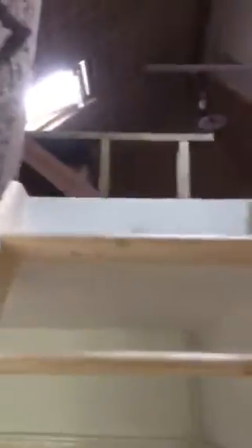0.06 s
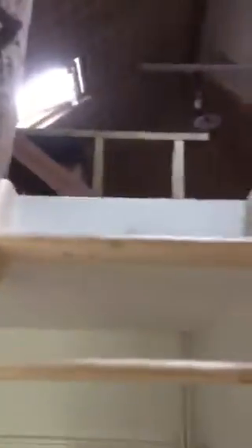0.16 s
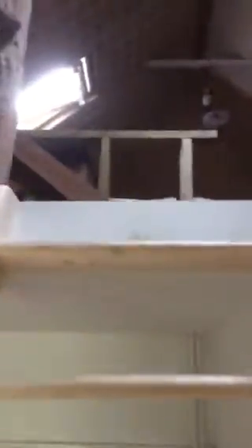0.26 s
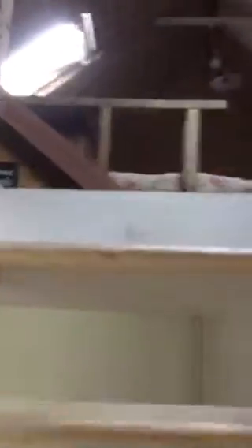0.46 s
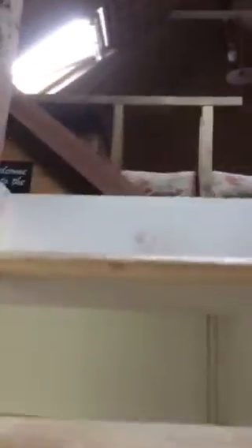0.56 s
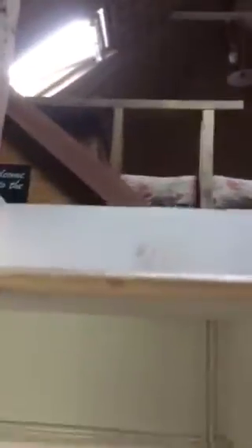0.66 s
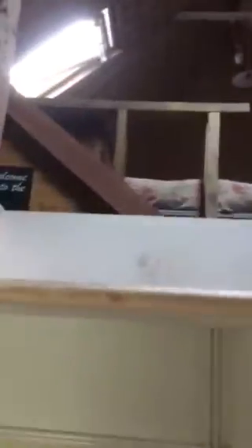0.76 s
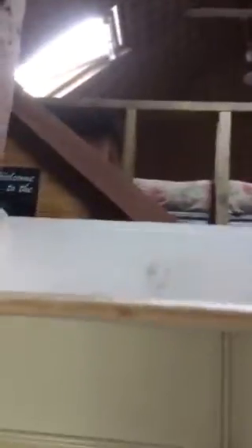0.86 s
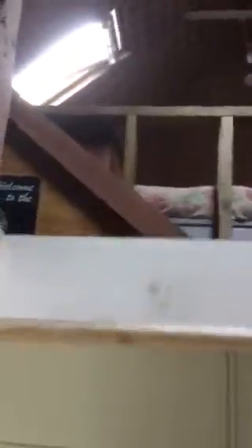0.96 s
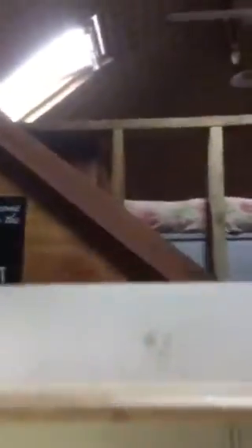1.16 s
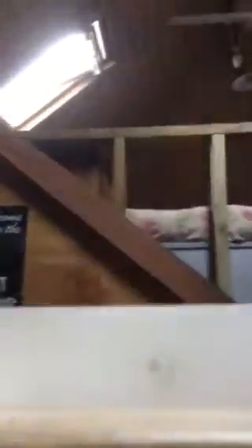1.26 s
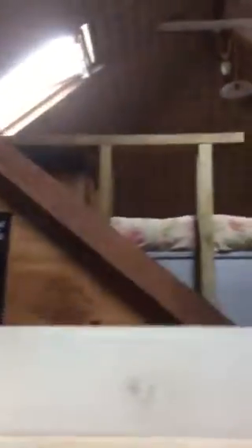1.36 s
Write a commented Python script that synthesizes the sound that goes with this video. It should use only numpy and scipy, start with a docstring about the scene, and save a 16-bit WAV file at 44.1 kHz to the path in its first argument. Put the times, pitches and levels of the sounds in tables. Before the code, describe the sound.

Heavy footsteps on wooden stairs: a hard slapping thud, then a duller knock, with faint creaks

```python
"""Two heavy steps on a wooden stair

Two heavy footsteps climb a wooden ladder-stair in a small room, close by.
Each foot knocks on a tread and the sole slaps flat: short bursts of coloured noise.
The weight sets the stair booming and the tread board ringing: fading sine tones and low noise.
Cloth and soles brush (grainy noise), and the wood ticks, creaks, pings and groans faintly.
Under it all lies the steady, quiet noise of the house."""
import sys
import numpy as np
from scipy import signal
from scipy.fft import rfft, irfft, next_fast_len
from scipy.io import wavfile
from scipy.ndimage import map_coordinates

SR = 44100
rng = np.random.default_rng(int(sys.argv[2]) if len(sys.argv) > 2 else 0)


def pcm_store(signal):
    """Save signal as 16-bit PCM."""
    levels = np.round(np.clip(np.atleast_2d(signal), -1, 1) * 32767)
    wavfile.write(sys.argv[1], SR, levels.astype(np.int16).T)


N = 61740  # length in samples: 1.4 s

# In every table, t60 is the time a sound takes to fade by 60 dB.
# The weight comes down: (time [s], level [dB], tread [0 lower, 1 upper])
THUDS = [(0.2331, -34.5, 0), (0.2530, -21.5, 0), (0.9206, -25.5, 1), (0.9640, -35, 1)]
# Low tones of the stair; those with an excess start sharp and sag as the weight loads them:
# (frequency [Hz], t60 [s], swell [s], starting excess [share of the frequency],
#  level on the lower tread [dB], level on the upper tread [dB])
STAIR_MODES = [(55.75, 0.4, 0.084, 0.15, 0, -1), (59.9, 0.39, 0.014, 0.39, -8, -8),
               (115.1, 0.32, 0.0048, 0.208, 4.5, -15), (150.7, 0.5, 0.051, 0.0082, -5, 4),
               (147.9, 0.4, 0.0027, 0.1934, -4.5, -7), (171, 0.093, 0.0061, 0.97, -6.5, -13.5),
               (202.05, 0.31, 0.0143, 0.02, -12, 1), (235.2, 0.42, 0.0051, 0.019, -55, -14.5),
               (253, 0.31, 0.0098, 0.06, -34.5, -13), (273, 0.41, 0.0058, 0, -24.5, -13.5),
               (306.4, 0.38, 0.0021, 0.035, -19, -26), (413.5, 0.252, 0.0021, 0.028, -19.5, -26)]
SAG_S = 0.0411
# Colour of the noisy part of the boom: (frequency [Hz], level [dB])
BOOM_COLOUR = [(25, -47), (45, -20), (65, -5), (95, 1.5), (150, 4.5), (210, -4), (300, -9), (450, -27),
               (900, -46.5)]
BOOM_DB, BOOM_T60_S, BOOM_SWELL_S = -13, 0.55, 0.0079

# The sole slaps flat: (time [s], level [dB], t60 [s], tilt [dB per octave],
#  room level [dB], tread [0 lower, 1 upper])
SLAPS = [(0.2538, -25.5, 0.023, 0.9, -5, 0), (0.2574, -29.5, 0.044, -3.5, -1.5, 0),
         (0.972, -37, 0.057, 0, -9, 1)]
# Colour of a slap: (frequency [Hz], level on the lower tread [dB], level on the upper tread [dB])
SLAP_COLOUR = [(100, -18, -13), (294, 0.5, -13), (480, -11.5, -7), (640, -5, -11), (876, -3.5, 4),
               (1230, 4.5, 4), (1485, -5.5, -13.5), (1784, -3, 5), (2150, -5.5, -8), (2870, -4.5, -4),
               (3330, -4.5, -13.5), (3800, -10, -11.5), (4270, -18, -13.5), (6730, -10.5, -18),
               (8060, -12, -15), (11300, -15, -22.5), (15500, -38, -25)]
SLAP_ATTACK_S = 0.00039

# The foot meets the lower, then the upper tread: (time [s], level [dB], t60 [s],
#  hollow ring frequency [Hz], hollow ring level [dB], hollow ring t60 [s])
KNOCKS = [(0.231, -36.5, 0.17, 281.8, -27.5, 0.095), (0.9206, -32, 0.083, 864, -31, 0.075)]
# Colour of a knock: (frequency [Hz], level on the lower tread [dB], level on the upper tread [dB])
KNOCK_COLOUR = [(101, -27, -35), (206, 6.5, 2), (350, 2, -12.5), (454, -6, 2), (600, -5, -4.5),
                (810, -9, 2.5), (1065, -4, -4), (1490, -9, -14), (1750, -8, -3), (2400, -10.5, -10),
                (3200, -7.5, -20.5), (3970, -13.5, -24), (5140, -22, -27), (8800, -36, -37),
                (15000, -42, -46)]
KNOCK_ATTACK_S, HOLLOW_ATTACK_S, KNOCK_ROOM_DB = 0.0015, 0.0058, -7

# Ring of the tread board:
# (frequency [Hz], t60 [s], level on the lower tread [dB], level on the upper tread [dB])
BOARD_MODES = [(629, .25, -3, -13), (778, .3, -10, 1), (815, .15, -8, 0), (940, .24, 0, -4),
               (1086, .28, -1, -14), (1121, .28, -5, -10), (1254, .28, -3, -9), (1328, .25, -4, -18),
               (1570, .25, -3, -18), (1703, .26, -3, -10), (2318, .24, -3, -15)]
BOARD_DB, BOARD_ATTACK_S = -43.5, 0.0041

# Sharp slips of a loaded joint: (time [s], level [dB], frequency [Hz], t60 [s])
SLIPS = [(1.0701, -51.5, 1774, 0.035), (1.106, -47.5, 1810, 0.037)]
SLIP_ATTACK_S = 0.0008

# Groans of the frame: (time of the peak [s], level [dB], width [s], frequency [Hz])
SWAYS = [(0.086, -71.5, 0.01, 160), (0.525, -53.5, 0.042, 60), (0.524, -54.5, 0.017, 148),
         (0.623, -62.5, 0.0054, 310), (0.81, -66, .035, 182), (0.85, -74.5, 0.11, 280),
         (1.127, -50, 0.021, 160), (1.148, -54, 0.017, 195), (1.184, -56.5, 0.022, 60)]
SWAY_WANDER_HZ, SWAY_WANDER_PER_S = 9.29, 40

# Small ticks of the joints: (time [s], level [dB], t60 [s])
TICKS = [(0.2355, -55, 0.0094), (0.2448, -51, 0.016), (0.3298, -45.5, 0.0088), (0.5030, -56.5, 0.0084),
         (0.9248, -53, 0.0085)]
# Colour of a tick: (frequency [Hz], level [dB])
TICK_COLOUR = [(500, -25), (3000, -8), (6500, -10), (12000, -6), (15500, -18)]
TICK_ATTACK_S = 0.0002

# Cloth and soles brush:
# (time of the peak [s], level [dB], rise [s], fall [s], tilt [dB per octave])
BRUSHES = [(0.457, -58.5, 0.011, 0.026, 1.6), (0.579, -59, 0.016, 0.045, 1),
           (0.617, -56, 0.016, 0.013, -1.3), (0.708, -63.5, 0.028, 0.018, -1),
           (0.811, -73, 0.1, 0.16, -3.5), (0.868, -67.5, 0.0069, 0.024, 7.5),
           (0.914, -63.5, 0.013, 0.039, 6), (1.129, -61.5, 0.011, 0.015, 2)]
# Colour of a brush: (frequency [Hz], level [dB])
BRUSH_COLOUR = [(100, -23), (310, -4.5), (450, -12), (1100, -10), (1600, 0.5), (2400, 1.5), (4000, -4),
                (5000, -9), (7000, -10.5), (12000, -16.5), (15500, -25)]
GRAIN_PER_S, GRAIN_DB = 900, -0.5

# The wood creaks: (time of the peak [s], level [dB], width [s], slips [per second],
#  resonance [Hz], width of the resonance before it is applied twice [Hz])
CREAKS = [(0.617, -67, .003, 400, 1600, 684), (0.612, -67.5, 0.035, 300, 1620, 248),
          (0.712, -59.5, .009, 190, 2550, 1289), (1.085, -65, 0.032, 400, 1780, 200),
          (1.13, -61, 0.017, 300, 1840, 220), (1.23, -76.5, 0.011, 210, 2150, 1500)]
SLIP_SCATTER, SLIP_SIZE_DB, CREAK_ROOM_DB = 0.2, 2, -12.5

# How long the room rings: (frequency [Hz], t60 [s])
ROOM = [(100, 0.34), (400, 0.48), (1500, 0.4), (4000, 0.32), (9000, 0.28), (15000, 0.22)]
ROOM_BUILD_S = 0.0041

# Colour of the quiet house: (frequency [Hz], level [dB])
HOUSE_COLOUR = [(15, -38), (25, -9), (43, -1.5), (101, 0.5), (389, -11.5), (433, -10), (1170, -12.5),
                (1270, -12.5), (1380, -13.5), (1850, -14.5), (15500, -26.5)]
HOUSE_DB = -69.5

LOW_CUT_HZ, TOP_HZ = 48.7, 15900


def stair():
    """The weight sets the frame booming; each tread favours other tones."""
    out = np.zeros(N)
    for s, db, tread in THUDS:
        k = int(round(tread))
        for hz, t60, rise, excess, *levels in STAIR_MODES:
            out += amp(db + levels[k]) * sagging(s, hz, rise, t60, excess)
        out += amp(db + BOOM_DB) * noise(BOOM_COLOUR) * struck(s, BOOM_SWELL_S, BOOM_T60_S)
    return out


def slaps():
    """The sole landing flat gives a bright crack: noise that starts almost at once."""
    out = np.zeros(N)
    for s, db, t60, tilt, room_db, tread in SLAPS:
        colour = [(hz, levels[round(tread)]) for hz, *levels in SLAP_COLOUR]
        crack = amp(db) * noise(colour, tilt) * struck(s, SLAP_ATTACK_S, t60)
        out += in_room(crack, room_db)
    return out


def knocks():
    """The dull first contact of each foot, with a short hollow ring of the spot it hits."""
    out = np.zeros(N)
    for tread, (s, db, t60, ring_hz, ring_db, ring_t60) in enumerate(KNOCKS):
        colour = [(hz, levels[tread]) for hz, *levels in KNOCK_COLOUR]
        contact = amp(db) * noise(colour) * struck(s, KNOCK_ATTACK_S, t60)
        out += in_room(contact, KNOCK_ROOM_DB)
        out += amp(ring_db) * ring(s, ring_hz, HOLLOW_ATTACK_S, ring_t60)
    return out


def boards():
    """The hardest contact of each step rings its tread board."""
    out = np.zeros(N)
    contacts = [SLAPS[0][0], KNOCKS[1][0]]  # times on the lower and the upper tread
    for tread, s in enumerate(contacts):
        for hz, t60, *levels in BOARD_MODES:
            out += amp(BOARD_DB + levels[tread]) * ring(s, hz, BOARD_ATTACK_S, t60)
    return out


def slips():
    """A loaded joint gives way with short pings."""
    return sum(amp(db) * ring(s, hz, SLIP_ATTACK_S, t60) for s, db, hz, t60 in SLIPS)


def sways():
    """Soft low groans of the frame, each wandering a little in pitch."""
    out = np.zeros(N)
    for s, db, width, centre_hz in SWAYS:
        steps = np.arange(N) * SWAY_WANDER_PER_S / SR
        wander = map_coordinates(rng.standard_normal(256), [steps])  # smooth random curve
        cycles = np.cumsum(centre_hz + SWAY_WANDER_HZ * wander) / SR
        out += amp(db) * bell(s, width) * unit(np.sin(2 * np.pi * cycles))
    return out


def ticks():
    """The joints give tiny dry clicks: very short bursts of noise."""
    return sum(amp(db) * noise(TICK_COLOUR) * struck(s, TICK_ATTACK_S, t60) for s, db, t60 in TICKS)


def brushes():
    """Soft, finely grained swells of friction as the legs move."""
    steps = np.arange(N) * GRAIN_PER_S / SR
    grain = map_coordinates(rng.standard_normal(N), [steps], order=1)
    rubbing = np.zeros(N)
    for s, db, rise, fall, tilt in BRUSHES:
        rubbing += amp(db) * noise(BRUSH_COLOUR, tilt) * swell(s, rise, fall)
    return unit(amp(GRAIN_DB * grain)) * rubbing


def creaks():
    """Wood sticks and slips: uneven pulses excite one resonance of the wood."""
    out = np.zeros(N)
    for s, db, width, rate, centre_hz, width_hz in CREAKS:
        gaps, sizes = rng.standard_normal((2, 600))
        slip_times = np.cumsum(np.abs(1 + SLIP_SCATTER * gaps)) / rate
        at = (slip_times * SR).astype(int)
        pulses = np.bincount(at, amp(SLIP_SIZE_DB * sizes), N)[:N]
        voiced = filtered(pulses, lambda hz: resonance(hz, centre_hz, width_hz) ** 2)
        out += amp(db) * unit(voiced) * bell(s, width)
    return in_room(out, CREAK_ROOM_DB)


def house():
    """The quiet of the house: steady, mostly low noise."""
    return amp(HOUSE_DB) * noise(HOUSE_COLOUR)


def in_room(x, room_db):
    """Add a room tail that builds up quickly; each pitch range fades at its own speed."""
    hz, t, z = signal.stft(rng.standard_normal(SR // 2), SR, nperseg=256)
    fading = z * amp(-60 * t / along(ROOM, hz)[:, None])
    tail = signal.istft(fading, SR, nperseg=256)[1]
    tail = tail * (1 - np.exp(-np.arange(len(tail)) / SR / ROOM_BUILD_S)) ** 2
    return x + amp(room_db) * signal.fftconvolve(x, tail / np.linalg.norm(tail))[:N]


def sagging(s, hz, rise, t60, excess):
    """A tone that swells gently while its pitch settles."""
    t = since(s)
    cycles = hz * (t + excess * SAG_S * (1 - np.exp(-t / SAG_S)))
    # The rise counts twice (struck holds it too), which softens the start.
    return np.sin(2 * np.pi * cycles) * (1 - np.exp(-t / rise)) * struck(s, rise, t60)


def ring(s, hz, attack, t60):
    """One fading tone, struck at time s."""
    return np.sin(2 * np.pi * hz * since(s)) * struck(s, attack, t60)


def struck(s, attack, t60):
    """Loudness curve of a blow at time s: a fast rise, then a steady fade in dB."""
    t = since(s)
    return (1 - np.exp(-t / attack)) * amp(-60 * t / t60)


def swell(s, rise, fall):
    """A rounded swell that peaks at time s."""
    t = np.arange(N) / SR - s
    return np.exp(1 - np.sqrt(1 + (t / np.where(t < 0, rise, fall)) ** 2))


def bell(s, width):
    """A bell-shaped swell that peaks at time s."""
    return np.exp(-0.5 * ((np.arange(N) / SR - s) / width) ** 2)


def since(s):
    """Seconds since time s, zero before."""
    return np.maximum(np.arange(N) / SR - s, 0)


def noise(colour, tilt_db=0):
    """Coloured noise of average (rms) level 1, tilted by some dB per octave."""
    white = rng.standard_normal(N)
    return unit(filtered(white, lambda hz: amp(along(colour, hz) + tilt_db * np.log2(hz + 1))))


def resonance(hz, centre, width):
    """How strongly one resonance passes each frequency."""
    return 1j * hz * width / (centre ** 2 - hz ** 2 + 1j * hz * width)


def filtered(x, response):
    """Scale every frequency in x by the response."""
    m = next_fast_len(N + SR // 2)  # spare room so that the end does not wrap to the start
    return irfft(rfft(x, m) * response(np.fft.rfftfreq(m, 1 / SR)), m)[:N]


def along(points, hz):
    """Read a curve of (frequency, value) points on a logarithmic frequency axis."""
    f, v = np.transpose(points)
    return np.interp(np.log(hz + 1), np.log(f + 1), v)


def unit(x):
    """Scale to an average (rms) level of 1."""
    return x / np.sqrt(np.mean(x ** 2) + 1e-20)


def amp(db):
    """Turn decibels into a gain."""
    return 10 ** (np.asarray(db) / 20)


def scene():
    """Both steps and their small sounds over the quiet of the house."""
    steps = stair() + slaps() + knocks() + boards()
    small_sounds = slips() + sways() + ticks() + brushes() + creaks()
    return (steps + small_sounds + house())[None]  # one channel


def record(dry):
    """The small microphone loses the deepest bass; nothing is kept from the top limit upwards."""
    def response(hz):
        low_cut = -hz ** 2 / (LOW_CUT_HZ ** 2 - hz ** 2 + 1j * hz * LOW_CUT_HZ)
        return low_cut * (hz < TOP_HZ)
    return np.array([filtered(x, response) for x in dry])


dry = scene()
out = record(dry)
pcm_store(out)
```